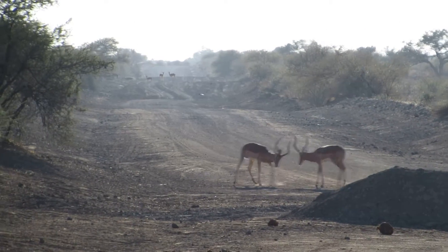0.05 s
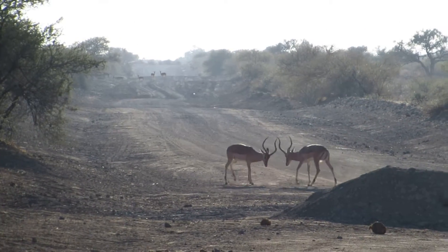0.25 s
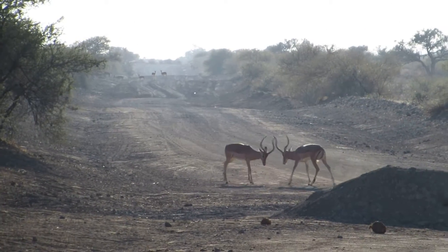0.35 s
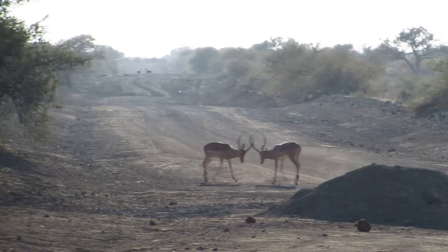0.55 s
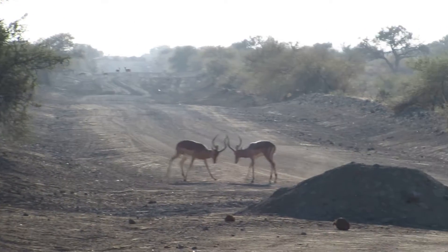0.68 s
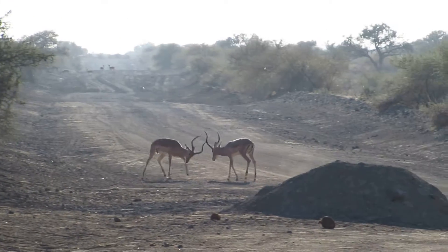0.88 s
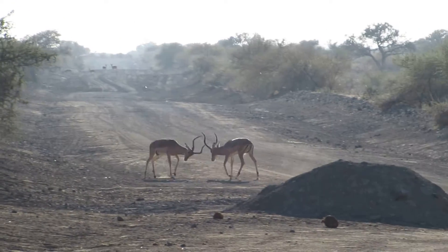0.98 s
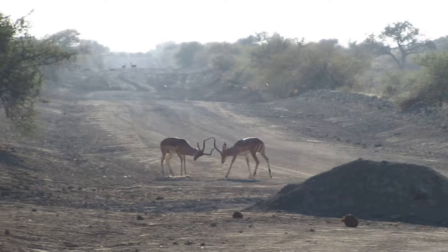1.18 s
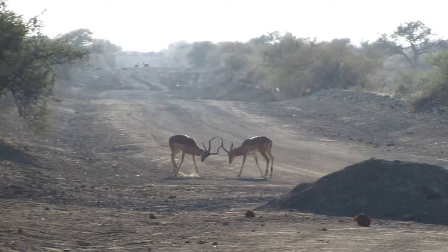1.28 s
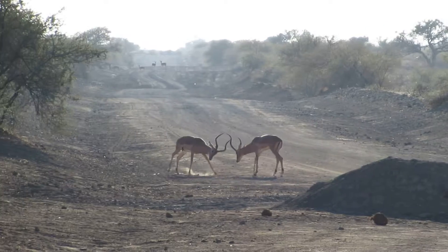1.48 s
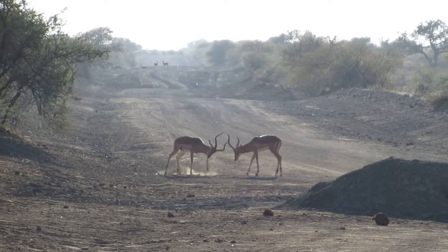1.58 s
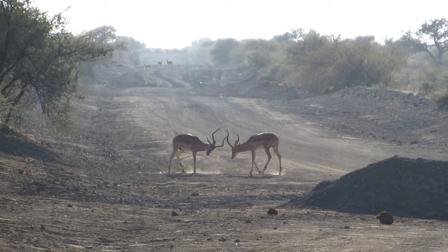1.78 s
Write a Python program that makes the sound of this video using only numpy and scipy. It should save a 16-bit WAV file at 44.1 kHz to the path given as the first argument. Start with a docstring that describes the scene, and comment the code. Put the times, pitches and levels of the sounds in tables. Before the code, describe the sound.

Antelope horns clash in a short, sharp clatter, with faint birds and hiss behind.

```python
"""Antelopes clashing horns

Two antelopes meet on a dry track, heard from one distant microphone: a quick run of hard knocks,
the ridged horns scraping between blows and ringing briefly as they slip apart. Small birds
whistle and buzz in the bushes all around, over a far flock, faint open-air hiss and a low hum."""
import sys
import numpy as np
from scipy import signal
from scipy.fft import rfft, irfft
from scipy.io import wavfile
from scipy.ndimage import uniform_filter1d

SR = 44100
rng = np.random.default_rng(int(sys.argv[2]) if len(sys.argv) > 2 else 0)


def generate_wav(signal):
    """Clip the signal to [-1, 1] and save it as 16-bit WAV at the path in sys.argv[1]."""
    frames = np.transpose(np.atleast_2d(signal))
    scaled = np.clip(frames, -1, 1) * 32767
    pcm = np.round(scaled).astype(np.int16)
    wavfile.write(sys.argv[1], SR, pcm)


N = 81585

# spectrum of the open-air hiss: frequency_hz, relative_db
HISS_SPECTRUM = [(12, -34), (20, -3.5), (140, -2.3), (500, -5), (1100, -5), (1550, -7), (2160, -5.5),
                 (3010, -11.5), (4560, -11.5), (10200, -17), (15000, -24.5)]
# low hum: pitch_hz, level_db
HUM_TONES = [(53, -73), (110, -73)]
# wind on the microphone: peak_s, width_s, level_db
WIND_PUFFS = [(.948, 0.025, -56), (1.695, 0.021, -60)]
# swell and ebb of the far flock: time_s, level_db
FLOCK_LEVELS = [(0, -54), (.13, -64), (.21, -51), (.30, -58.5), (.42, -48.5), (.64, -59.5), (.75, -55),
                (.90, -59), (.96, -52), (1.09, -52.5), (1.29, -68), (1.33, -55), (1.42, -55), (1.5, -56.5),
                (1.61, -52.5), (1.72, -66.5), (1.85, -65.5)]
# clean notes from the nearer bushes: start_s, length_s, first_hz, middle_hz, last_hz, level_db
BIRD_CHIRPS = [(0.125, 0.043, 2210, 2300, 2350, -58), (0.183, 0.042, 3976, 3340, 2960, -52.5),
               (0.218, 0.057, 4330, 3410, 2870, -55), (0.255, 0.039, 3390, 3006, 2820, -56),
               (0.254, 0.023, 2120, 2214, 2070, -55), (0.311, 0.045, 2120, 2370, 2520, -52.5),
               (0.406, .036, 3967, 3300, 2490, -50.5), (0.425, 0.012, 6460, 6300, 5950, -50),
               (0.572, 0.0314, 3030, 2670, 2540, -54), (0.598, 0.023, 3730, 3550, 2920, -53.5),
               (0.722, 0.033, 3210, 3980, 4110, -55.5), (.728, 0.035, 2766, 2450, 2490, -54.5),
               (0.764, .05, 6800, 7000, 7400, -68), (0.783, 0.026, 4200, 3600, 2800, -57),
               (.962, 0.026, 6700, 6850, 6900, -66), (1.082, .02, 4200, 3690, 3430, -57),
               (1.198, 0.048, 4170, 3220, 2760, -58), (1.259, 0.047, 5500, 3646, 2170, -61.5),
               (1.275, 0.08, 5480, 5750, 5880, -65.5), (1.397, 0.023, 3040, 3350, 3950, -53),
               (1.417, 0.033, 3950, 3600, 3240, -55.5), (1.427, 0.031, 5230, 4600, 4550, -60.5),
               (1.581, 0.0176, 5520, 4900, 4300, -60), (1.65, 0.027, 3520, 3563, 3350, -57.5)]
# rough notes from the same bushes: start_s, length_s, first_hz, last_hz, level_db
BIRD_BUZZES = [(0.17, 0.031, 5790, 3410, -56), (.977, 0.035, 6400, 5450, -58),
               (1.344, 0.0177, 3450, 3820, -52), (1.597, .048, 5620, 4520, -57.5)]
# modes of the horns: pitch_hz, relative_db, t60_s
HORN_MODES = [(354, -16, .015), (658, -9.5, 0.033), (962, -5.5, 0.037), (1540, -3, 0.046),
              (1736, -13, 0.048), (2002, -9.5, 0.067), (2200, -12, 0.11), (2724, 0, 0.033),
              (3595, -2, 0.014), (4060, 0, .015), (7570, -11, 0.019), (11200, -14, 0.029)]
# horn sliding over horn: start_s, length_s, level_db, tilt_db_per_octave
HORN_SCRAPES = [(.367, 0.014, -48, 3), (0.391, 0.0528, -46, 0.5), (0.485, 0.019, -45, 3),
                (0.506, 0.025, -42.5, -1), (0.536, 0.017, -40.5, -0.5), (0.554, 0.017, -47.5, -5.5)]
# spectrum of the ridge clicks: frequency_hz, relative_db
SCRAPE_SPECTRUM = [(100, -34), (420, -35), (620, -1), (1150, -1), (1600, 0), (2300, 6), (3500, -4),
                   (4600, -2.5), (6700, -2.5), (8700, -15), (15000, -24)]
# blows of horn on horn: start_s, ring_db, crack_db, favoured_hz
HORN_KNOCKS = [(0.3827, -37, -31, 716), (.389, -35.5, -49, 2700), (0.3961, -39, -51, 1520),
               (0.4054, -46, -43, 2700), (.4165, -43, -49, 3800), (.433, -41, -59, 2700),
               (0.4484, -32, -35.5, 3800), (.4675, -45, -46.5, 2090), (.4723, -27.5, -37.5, 3900),
               (.474, -19.5, -30, 3670), (0.4783, -36, -51, 1534), (0.491, -36, -36.5, 2700),
               (0.5109, -34, -41, 1520), (.533, -36.5, -34, 800), (0.539, -36, -38.5, 3600),
               (0.5511, -35, -37, 1700), (0.558, -41, -52, 2100)]
# spectrum of the contact crack: frequency_hz, relative_db
CRACK_SPECTRUM = [(60, -27), (250, -3.5), (450, -9), (750, 3), (1200, 1), (3200, 1), (4800, -1.5),
                  (7000, -2.5), (9000, -7), (15000, -15.5)]
# calls of the bird closest to the microphone: start_s, length_s, level_db
BIRD_PEEPS = [(0.996, .029, -42), (1.045, .026, -41.5)]

HORN_RISE_S, HORN_DETUNE = 0.0014, 0.035  # detune is a fraction of the pitch
WARBLE_HZ = 295


def amp(db):
    """Decibels to gain."""
    return 10 ** (np.asarray(db) / 20)


def unit(x):
    """Scales to rms 1."""
    return x / np.sqrt(np.mean(x ** 2) + 1e-20)


def add(mix, start_s, sound):
    """Lays a sound into the mix."""
    part = mix[max(round(start_s * SR), 0):][:len(sound)]
    part += sound[:len(part)]


def gains(spectrum, hz):
    """Reads a spectrum table as gains at the given frequencies."""
    table_hz, db = np.transpose(spectrum)
    return amp(np.interp(np.log(hz + 1), np.log(table_hz), db))


def colour(x, spectrum, tilt_db=0):
    """Gives a sound a spectrum and a tilt per octave above 500 Hz, at rms 1."""
    hz = np.fft.rfftfreq(len(x), 1 / SR)
    tilt = amp(tilt_db * np.log2(np.maximum(hz, 500) / 500))
    return unit(irfft(rfft(x) * gains(spectrum, hz) * tilt, len(x)))


def drift(rate_hz):
    """Random motion up to about the given rate, at rms 1."""
    hz = np.fft.rfftfreq(N, 1 / SR)
    return unit(irfft(rfft(rng.standard_normal(N)) * np.exp(-(hz / rate_hz) ** 2), N))


def open_air(hiss_db=-55, patch_db=1.12, waver_hz=2.2, puff_hz=26.6):
    """Faint, slightly patchy hiss, a wavering low hum and two soft puffs of wind on the microphone."""
    t = np.arange(N) / SR
    hz, _, noise = signal.stft(rng.standard_normal(N), SR, nperseg=1024)
    patches = uniform_filter1d(rng.standard_normal(noise.shape), size=14, axis=0)
    patches = unit(uniform_filter1d(patches, size=6, axis=1))
    shaped = noise * gains(HISS_SPECTRUM, hz)[:, None] * amp(patch_db * patches)
    hiss = unit(signal.istft(shaped, SR, nperseg=1024)[1][:N])
    hum = sum(amp(db) * unit(np.sin(2 * np.pi * f * t + drift(waver_hz))) for f, db in HUM_TONES)
    puffs = sum(amp(db) * np.exp(-((t - peak) / width) ** 2) for peak, width, db in WIND_PUFFS)
    rumble = unit(np.sin(2 * np.pi * puff_hz * t + drift(puff_hz)))
    return amp(hiss_db) * hiss + hum + puffs * rumble


def whistle(start_s, length_s, pitches, warble, overtone=0):
    """A bird note that glides through a first, middle and last pitch."""
    progress = np.arange(0, length_s, 1 / SR) / length_s
    glide_hz = np.polyval(np.polyfit([0, .5, 1], pitches, 2), progress)
    bend = np.take(warble, round(start_s * SR) + np.arange(len(progress)), mode="wrap")
    phase = 2 * np.pi * np.cumsum(glide_hz * (1 + bend)) / SR
    envelope = np.sqrt(2) * np.sin(np.pi * progress) ** 0.38
    return envelope * (np.sin(phase) + overtone * np.sin(2 * phase))


def far_flock(count=500, centre_hz=3200, spread=.155, glide=.1096, note_s=.029, overtone_db=-13.5):
    """Birds far from the microphone: overlapping short glides that swell and ebb together."""
    out, warble = np.zeros(N), 0.026 * drift(WARBLE_HZ)
    notes = zip(rng.random((count, 3)), rng.standard_normal((count, 3)))
    for k, ((delay, softness, stretch), (pitch, first, last)) in enumerate(notes):
        start = (k + delay) / count * N / SR
        middle_hz = centre_hz * np.exp(spread * np.clip(pitch, -1.8, 1.4))
        pitches = middle_hz * np.exp(glide * np.array([first + .5, 0, last - .5]))
        note = whistle(start, note_s * (.5 + stretch), pitches, warble, amp(overtone_db))
        add(out, start, amp(-12 * softness) * note)
    levelled = out / np.sqrt(uniform_filter1d(out ** 2, size=3000) + 1e-12)
    return levelled * amp(np.interp(np.arange(N) / SR, *np.transpose(FLOCK_LEVELS)))


def bush_birds(rasp_hz=716, flicker_db=3, flicker_hz=140):
    """Nearer chirps that flicker in loudness; a fast, deep pitch wobble makes a few of them buzz."""
    out, warble, rasp = np.zeros(N), 0.011 * drift(WARBLE_HZ), 0.082 * drift(rasp_hz)
    for start, length, first, middle, last, db in BIRD_CHIRPS:
        add(out, start, amp(db) * whistle(start, length, (first, middle, last), warble))
    for start, length, first, last, db in BIRD_BUZZES:
        add(out, start, amp(db) * whistle(start, length, np.linspace(first, last, 3), rasp))
    return out * amp(flicker_db * drift(flicker_hz))


def horn_ring(detune, favoured_hz=None, favour_db=8, favour_octaves=0.29, size=8000):
    """One ring of the horn modes; the place of contact favours those near one pitch."""
    t = np.arange(size) / SR
    hz, db, t60 = np.transpose(HORN_MODES)[:, :, None]
    if favoured_hz:
        db = db + favour_db * np.exp(-(np.log2(hz / favoured_hz) / favour_octaves) ** 2)
    hz = hz * (1 + detune * rng.uniform(-0.97, 1, hz.shape))
    modes = amp(db - 60 * t / t60) * np.sin(2 * np.pi * hz * t)
    ring = modes[::2].sum(0) - modes[1::2].sum(0)  # neighbouring modes start in opposite phase
    return ring / np.sqrt(np.sum(amp(db) ** 2) / 2)


def horn_scrapes(ridges_per_s=2200, edge_s=.004, ring_db=-9.5, size=8192):
    """Ridges catch in a dense train of tiny clicks that also ring the horns."""
    out, t = np.zeros(N), np.arange(size) / SR
    for start, length, db, tilt in HORN_SCRAPES:
        catches = rng.random(size) < ridges_per_s / SR
        clicks = catches * amp(-1.5 * rng.uniform(-0.87, 1, size)) * rng.choice([-1, 1], size)
        pressure = np.clip(np.minimum(t, length - t) / edge_s + .5, 0, 1)
        ring = horn_ring(HORN_DETUNE)
        body = signal.fftconvolve(unit(clicks) * pressure, ring / np.linalg.norm(ring))[:size]
        grit = pressure * colour(clicks, SCRAPE_SPECTRUM, tilt)
        add(out, start, amp(db) * (grit + amp(ring_db) * body))
    return out


def horn_knocks(crack_decay_s=0.005, size=8000):
    """Each blow is a short gritty crack and the hollow ring of the horns."""
    out, t = np.zeros(N), np.arange(size) / SR
    hardest_db = max(row[1] for row in HORN_KNOCKS)
    rise = np.minimum(t / HORN_RISE_S, 1)
    decay = np.exp(-np.maximum(t - HORN_RISE_S, 0) / crack_decay_s)
    for start, ring_db, crack_db, favoured_hz in HORN_KNOCKS:
        crack = colour(rng.standard_normal(size), CRACK_SPECTRUM) * decay
        # light knocks land off the main contact point and ring a little out of tune
        ring = horn_ring(HORN_DETUNE * (1 - amp(ring_db - hardest_db)), favoured_hz)
        add(out, start, rise * (amp(ring_db) * ring + amp(crack_db) * crack))
    return out


def horn_release(start_s=.549, pitch_hz=593, level_db=-44.5, t60_s=0.16):
    """The horns slip apart and swing freely, humming briefly on one low note."""
    t = np.maximum(np.arange(N) / SR - start_s, 0)
    envelope = np.minimum(t / HORN_RISE_S, 1) * amp(level_db - 60 * t / t60_s)
    return envelope * np.sin(2 * np.pi * pitch_hz * t)


def closest_bird(arch_hz=(1850, 2470, 1575), dip_db=14):
    """A clean double peep; each note arches up and down and is softer at its top."""
    out = np.zeros(N)
    for start, length, db in BIRD_PEEPS:
        note = whistle(start, length, arch_hz, warble=np.zeros(N))
        progress = np.linspace(0, 1, len(note))
        dip = np.exp(-((progress - .42) / 0.15) ** 2)
        add(out, start, note * amp(db - dip_db * dip))
    return out


def bush_scatter(x, t60_s=0.23, echoes_per_s=2000, gap_s=.004):
    """Thin reflections from the ground and thorn bushes."""
    t = np.arange(SR // 2) / SR
    echoes = rng.choice([-1, 1], len(t)) * (rng.random(len(t)) < echoes_per_s / SR)
    response = echoes * amp(-60 * t / t60_s) * (t > gap_s)
    return signal.fftconvolve(x, response / np.linalg.norm(response))[:N]


def scene(clear_wet_db=-20, bush_wet_db=-7):
    """One microphone on both channels; the horns and closest bird arrive with little scatter."""
    clear = horn_knocks() + horn_scrapes() + horn_release() + closest_bird()
    birds = bush_birds()
    scatter = bush_scatter(amp(clear_wet_db) * clear + amp(bush_wet_db) * birds)
    mix = clear + birds + scatter + far_flock() + open_air()
    return np.array([mix, mix])


def record(dry):
    """The recorder cuts the treble above 15150 Hz."""
    lowpass = signal.firwin(401, 15150, window=("kaiser", 8), fs=SR)
    return signal.oaconvolve(dry, lowpass[None], "same")


dry = scene()
out = record(dry)
generate_wav(out)
```